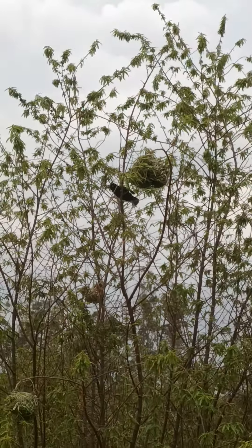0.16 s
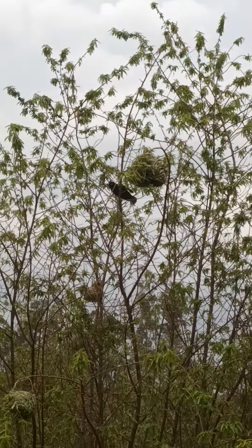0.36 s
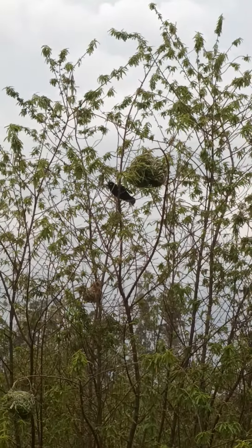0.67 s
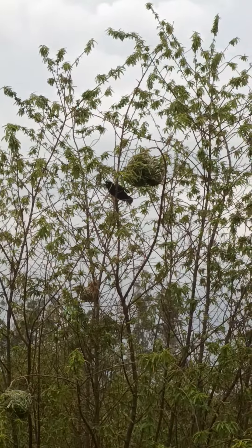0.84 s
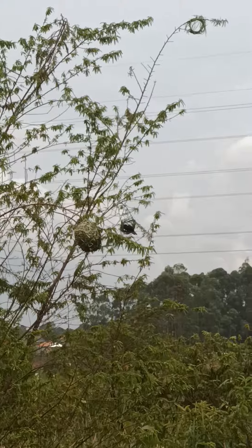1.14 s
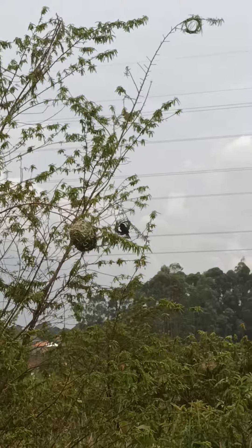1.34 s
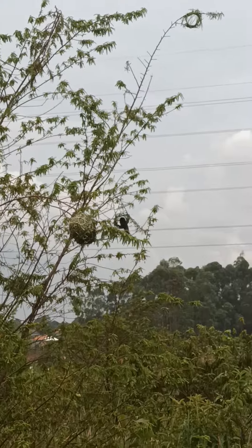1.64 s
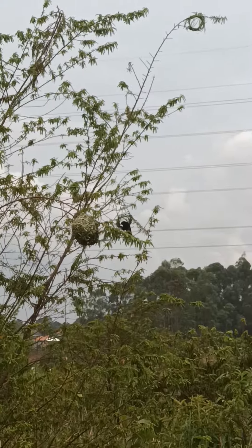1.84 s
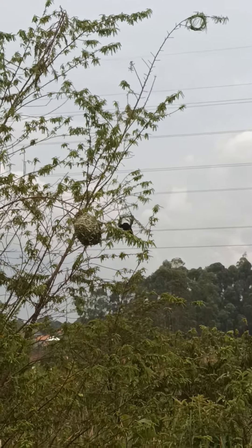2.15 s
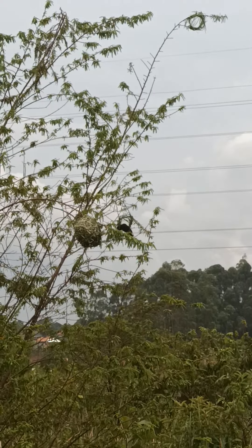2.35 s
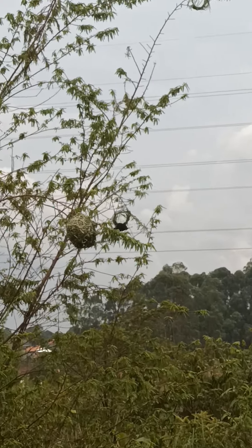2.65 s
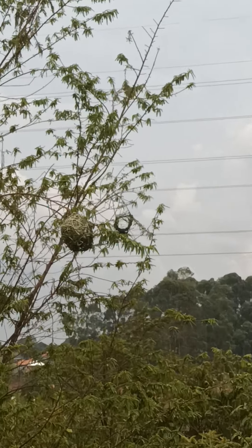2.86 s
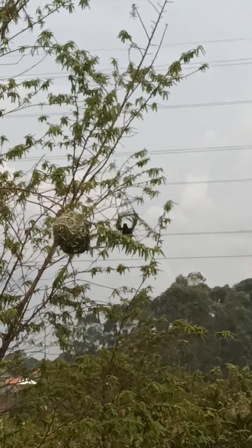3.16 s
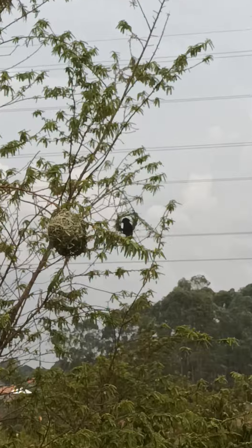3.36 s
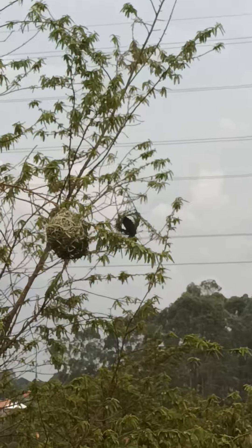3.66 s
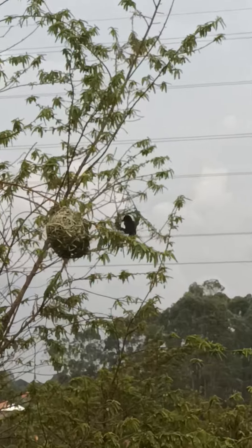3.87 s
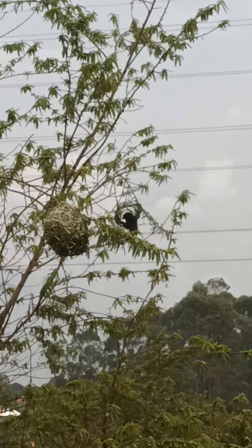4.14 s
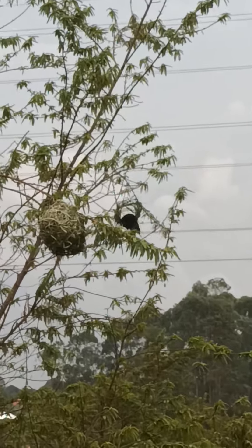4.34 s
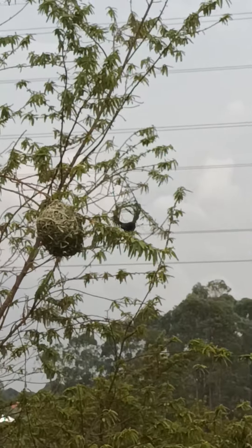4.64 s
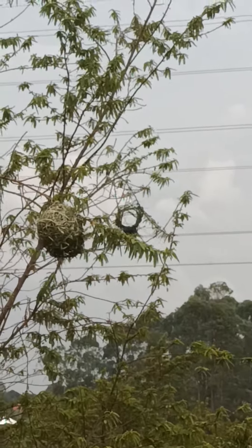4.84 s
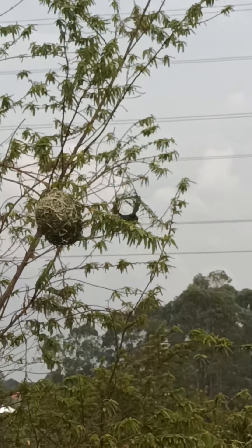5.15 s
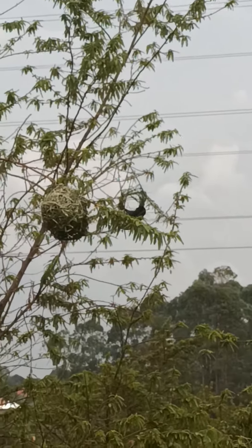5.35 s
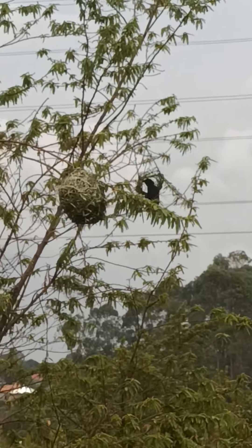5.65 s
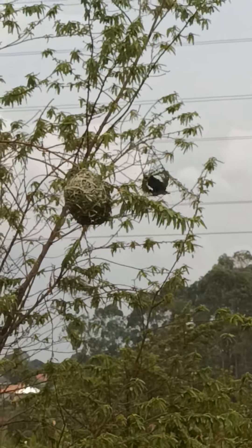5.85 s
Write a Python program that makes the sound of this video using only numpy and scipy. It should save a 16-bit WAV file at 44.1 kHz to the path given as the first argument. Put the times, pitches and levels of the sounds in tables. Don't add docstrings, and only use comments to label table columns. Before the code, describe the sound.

A weaver colony in a thin, leafy tree, heard outdoors in phone stereo, the near birds slightly left. A haze of far twittering, soft steady cricket trills and a low wavering road hum run throughout. From 0.3 s, bright rising two-toned calls ending in tiny rasps repeat among high pips and quick slurs; a dull, faint case tap comes at 0.4 s. The chatter swells by 0.7 s. Around 1.5 s there is a dry rattle with a nasal whine, then another call. From 2 to 3 s it is thickest: sharp short calls, rasps, a steep chirp, a slow churr and a faint low whistle falling near 3 s. A long buzzing wheeze stretches from 3.7 to 4.3 s, with a quick low whistle and a call within it. Calls cluster again at 4.4-4.7 s, thin out, then return with rasps and a faint whine from 5.1 s to the end.

```python
import sys
import numpy as np
from scipy import signal
from scipy.fft import rfft, irfft, next_fast_len
from scipy.io import wavfile
from scipy.ndimage import uniform_filter1d, map_coordinates

SR = 44100
rng = np.random.default_rng(int(sys.argv[2]) if len(sys.argv) > 2 else 0)


def to_linear_factor(level_db):
    exponent = np.asarray(level_db, float) / 20
    return 10 ** exponent


def file_out(sig):
    cols = np.atleast_2d(sig).T
    lim = np.clip(cols, -1, 1)
    pcm = np.round(lim * 32767).astype(np.int16)
    wavfile.write(sys.argv[1], SR, pcm)


N = 264600

# time in seconds, level in dB.
EXCITEMENT = [(0, -46.5), (.23, -46), (.7, -40.5), (1.3, -42.5), (1.47, -45.5), (1.6, -41.5), (2.0, -42.5),
              (2.32, -40.5), (3.02, -43), (3.5, -44), (4.0, -45.5), (4.3, -45), (4.5, -42), (4.7, -43.5),
              (4.9, -45.5), (5.2, -43.5), (5.46, -47), (6.0, -44)]
# frequency in Hz, density in dB per Hz.
HAZE_LOW = [(1500, -10), (2200, -1.5), (2800, -5.5), (3600, 2.5)]
HAZE_BODY = [(2240, -59), (3800, -14), (4260, -5), (4940, -9.5), (5610, -1.5), (7330, -12.5), (8000, -14.5),
             (10400, -17), (17600, -120)]
HAZE_TOP = [(4120, -38), (7000, -6.5), (9710, -9.5), (12000, -17), (12900, -18.5), (14800, -16),
            (15500, -23), (15800, -51)]
ROAD = [(15, -26), (25, -7.5), (48, 1.5), (74, -0.5), (103, -4), (173, -18), (301, -13.5), (505, -18),
        (880, -19), (1430, -20.5), (1800, -21.5), (2340, -36), (3960, -120)]
# frequency in Hz, correlation [0 to 1].
PORT_LIKENESS = [(60, 1), (300, 0.86), (700, 0.76), (1200, 0.52), (2500, 0.17), (8000, 0.06)]
# frequency in Hz, gain in dB.
MICROPHONE = [(25, -0.5), (45, 1), (9500, -1), (11500, -6), (15000, -1.5), (15760, -1), (15790, -80)]
# frequency in Hz, share of moments [0 to 1].
EMPTIED = [(1200, 0), (1500, .05), (2000, .08), (2700, .2), (3400, .07), (4000, .03), (9000, .04),
           (10000, .3), (11500, .6), (13000, .46), (14800, .46), (15500, .8)]
# start in seconds, peak in dB.
TAPS = [
    (0.425, -44),
]
# start in seconds, length in seconds, pitch in Hz, pulses per second, level in dB.
CRICKETS = [
    (3.0, 1.58, 8350, 68.2, -47),
    (0, .7, 4400, 39.6, -48.5),
    (.7, 3.7, 4450, 39.6, -54),
    (4.4, 1.7, 4500, 39.6, -49.5),
    (0, 6, 5750, 90, -52),
]
# time in seconds, pitch in Hz, level in dB.
LOW_WHISTLES = [
    [(0, 1565, -72), (.2, 1499, -55), (.33, 1445, -56.5), (.42, 1340, -53)],
    [(2.78, 1260, -55), (2.84, 1488, -56.5), (3.03, 1410, -51), (3.17, 1228, -52.5), (3.32, 1166, -58),
     (3.55, 937, -66)],
    [(3.83, 1900, -52), (3.86, 2350, -54), (3.92, 2600, -49), (3.99, 2700, -47), (4.1, 2410, -49)],
    [(5.2, 2310, -57), (5.3, 2120, -58), (5.52, 2000, -61), (5.565, 1760, -53), (5.6, 1680, -52),
     (5.635, 1400, -57)],
    [(1.99, 3700, -40), (2.04, 4050, -37), (2.075, 3500, -39)],
    [(0, 2070, -62), (.12, 2015, -57)],
    [(4.27, 1154, -59), (4.34, 1400, -57), (4.41, 1694, -50)],
]
# start in seconds, length in seconds, pitch in Hz, pulses per second, level in dB.
CHURRS = [
    (2.363, .428, 2920, 41, -53),
    (2.419, 0.18, 930, 91, -57),
    (4.162, 0.153, 1040, 68.5, -55),
]
# start in seconds, length in seconds, centre in Hz, width in Hz, level in dB.
RASPS = [(0.073, 0.071, 6820, 3970, -41), (0.602, 0.053, 6460, 3000, -48),
         (1.868, 0.056, 5050, 6500, -35.5), (2.099, 0.075, 7100, 2520, -35),
         (5.141, 0.066, 3260, 2200, -45), (2.334, 0.071, 10300, 1800, -38), (2.552, 0.085, 6500, 4500, -38),
         (2.788, 0.068, 4660, 2500, -37), (3.304, 0.62, 10480, 1500, -49.5),
         (4.557, 0.017, 6250, 6000, -37.5), (5.219, 0.036, 4800, 1500, -37.5),
         (5.221, 0.032, 8100, 2500, -42.5), (5.602, 0.048, 5530, 4150, -36), (1.874, 0.38, 2180, 600, -55),
         (2.85, 0.26, 2800, 910, -49.5)]
# start in seconds, length in seconds, pitch in Hz,
# pulses per second, level in dB.
WHEEZES = [(3.68, .64, 5450, 378, -35), (3.5, .75, 9500, 378, -50), (3.55, .7, 11500, 378, -56),
           (3.72, .42, 10100, 378, -49), (3.76, .5, 10900, 378, -50), (3.6, .8, 14300, 378, -59),
           (3.65, .7, 15300, 378, -62), (1.52, .2, 4400, 123, -48), (1.54, .27, 3750, 123, -44),
           (1.62, .19, 3350, 123, -43), (5.14, .32, 3050, 150, -53), (5.16, .42, 2120, 150, -52.5),
           (5.16, .46, 2600, 150, -53), (5.14, .3, 1550, 150, -62), (5.14, .4, 1030, 150, -60),
           (5.62, .14, 1300, 90, -57)]
# start in seconds, length in seconds, centre in Hz, width in Hz, pulses per second, level in dB.
RATTLES = [
    (1.55, .25, 4000, 260, 61.5, -40.5),
]
# start in seconds, length in seconds, # pitch in Hz, level in
# dB.
PIPS = [(0.058, 0.033, 8400, -36), (0.073, 0.013, 6670, -27.5), (0.105, 0.015, 6640, -29),
        (0.056, 0.028, 5260, -37.5), (0.629, .03, 7560, -38), (0.855, .027, 7120, -34.5),
        (0.883, 0.024, 6470, -32.5), (0.912, 0.019, 3950, -38), (1.161, 0.033, 5830, -27.5),
        (1.35, 0.033, 6780, -38), (1.399, .022, 5750, -35), (1.31, 0.065, 3954, -36.5),
        (1.566, 0.026, 4150, -35), (1.867, 0.04, 4010, -35), (1.908, 0.029, 6550, -42),
        (1.946, 0.026, 3560, -41), (2.151, 0.023, 6900, -34), (2.359, 0.048, 6940, -31),
        (2.378, 0.036, 3850, -44), (2.449, 0.049, 5120, -35.5), (2.484, 0.014, 6520, -33),
        (2.716, 0.032, 5020, -34.5), (3.02, 0.074, 5660, -39), (3.084, 0.026, 4095, -40.5),
        (3.195, 0.01, 9340, -36.5), (3.35, 0.036, 5630, -33.5), (3.358, .036, 4130, -42),
        (4.44, 0.03, 5660, -41), (4.49, 0.023, 3326, -40.5), (2.129, 0.023, 7550, -32),
        (2.82, 0.02, 4250, -35.5), (2.86, 0.02, 3900, -34.5), (3.042, 0.054, 6870, -40),
        (3.731, 0.047, 6900, -39.5), (4.508, .016, 5460, -40), (4.542, 0.058, 3640, -47),
        (2.345, 0.038, 10300, -38), (4.545, .02, 1843, -48), (4.925, 0.024, 2150, -51),
        (1.16, 0.029, 4200, -43), (5.954, 0.042, 7540, -33), (5.61, .04, 4740, -37), (5.62, .02, 9400, -40),
        (1.24, 0.052, 2210, -48), (1.57, 0.089, 2450, -48.5), (5.28, .05, 483, -60),
        (2.15, 0.053, 9500, -40), (5.62, 0.071, 1000, -58)]
MORE_PIPS = [(2.183, 0.027, 5600, -31.5), (2.21, .04, 4000, -42), (2.29, 0.042, 3500, -41.5),
             (2.405, 0.021, 5400, -31), (2.635, 0.022, 4050, -34), (2.96, .04, 3450, -46),
             (1.18, 0.022, 3450, -47), (1.37, .015, 3650, -39), (.145, .02, 4150, -41)]
# start in seconds, length in
# seconds, first pitch in Hz, last pitch in Hz, level in dB.
RISES = [(0, 0.073, 7800, 8350, -43), (.245, 0.032, 6500, 7400, -41.5), (.59, .061, 6050, 6620, -37),
         (.69, .02, 6060, 7030, -42), (1.135, 0.012, 6850, 7600, -28.5), (1.7, 0.056, 1450, 1580, -51),
         (1.885, 0.043, 4830, 5140, -37), (2.02, .06, 5150, 5490, -39.5), (2.075, .04, 5550, 6050, -33.5),
         (2.11, .028, 6260, 7550, -29), (2.33, .04, 5400, 5740, -40), (2.52, 0.067, 5280, 5900, -42.5),
         (3.67, 0.072, 1060, 1400, -59.5), (4.055, .065, 2890, 3010, -47.5), (4.71, .07, 2300, 2960, -51),
         (4.775, 0.039, 5890, 6500, -36), (4.81, .05, 6750, 7810, -35.5), (2.755, .03, 8300, 9000, -38),
         (2.83, 0.028, 8400, 9020, -39), (3.33, .05, 5300, 5750, -40.5), (.6, .05, 6600, 7600, -41),
         (1.36, .04, 5290, 5820, -37), (5.085, 0.072, 1924, 2030, -54.5)]
CLIMBS = [
    (2.748, .045, 5500, 7700, -31.5),
    (1.423, .052, 6400, 8250, -33.5),
    (.325, 0.026, 4600, 5500, -38),
]
FALLS = [(.27, 0.057, 6770, 6280, -38.5), (0.082, 0.027, 8400, 7300, -44), (1.383, .016, 5800, 5600, -35),
         (3.77, 0.033, 8000, 4800, -38), (3.77, 0.029, 5900, 5200, -41), (3.085, 0.0253, 7300, 6000, -36),
         (3.085, 0.0245, 5900, 5300, -36), (2.4, 0.0223, 6300, 6500, -34), (2.13, .03, 3400, 3050, -46),
         (4.466, .015, 7900, 7000, -36), (4.676, .014, 7200, 5300, -34), (4.905, .03, 4300, 2200, -46),
         (1.6, .022, 6800, 5800, -35), (5.843, .012, 7000, 3400, -30), (1.665, 0.0138, 5800, 4200, -31),
         (1.5, 0.013, 7500, 5500, -39), (5.015, 0.048, 3050, 2400, -52), (4.435, .035, 2650, 1900, -53),
         (5.79, 0.0405, 3100, 2400, -50.5), (.78, .04, 3200, 2600, -49), (.4, 0.019, 6900, 6000, -35),
         (3.42, 0.027, 7100, 7800, -41), (0.97, 0.013, 5800, 5520, -30), (1.225, 0.043, 4020, 2900, -41.5),
         (1.41, 0.02, 4370, 3650, -32.5), (1.53, 0.024, 9450, 8300, -34.5), (1.95, 0.023, 7150, 6700, -40),
         (2.41, 0.025, 11000, 9300, -30.5), (2.6, .03, 7000, 5640, -35), (2.635, 0.062, 4100, 3680, -36),
         (2.69, 0.0197, 4500, 4060, -32.5), (2.68, .023, 8930, 8400, -44), (3.195, 0.017, 4910, 4090, -36),
         (3.235, .03, 1800, 1570, -47), (3.44, .07, 6100, 5360, -34.5), (3.62, 0.047, 4600, 2160, -50),
         (3.91, 0.035, 4460, 2460, -50), (4.22, 0.029, 2610, 1200, -51.5), (4.585, 0.015, 1800, 1820, -43),
         (2.243, .052, 6100, 3900, -40), (4, 0.028, 4400, 3140, -55), (4.985, 0.024, 4500, 3950, -38),
         (5.16, 0.035, 4630, 3900, -45), (5.21, 0.019, 4680, 4300, -37)]
# start in seconds, length in seconds, upper voice in Hz, lower voice in Hz, level in dB.
ARCHED_CALLS = [(0.991, 0.084, 6590, 2470, -26.5), (1.261, 0.1, 6585, 2533, -28),
                (1.58, 0.094, 6520, 2350, -28.5), (2.176, 0.098, 6880, 2780, -32.5),
                (2.82, .1, 6810, 3020, -30.5), (5.308, 0.11, 6450, 2930, -34.5)]
CLIMBING_CALLS = [(0.329, 0.086, 6520, 2877, -28), (.455, 0.13, 6800, 2110, -31),
                  (0.74, 0.087, 6500, 2960, -29.5), (4.028, 0.08, 6260, 2990, -28.5),
                  (4.403, 0.07, 7100, 2170, -33.5), (4.589, 0.097, 6390, 2880, -29),
                  (4.962, 0.1, 6380, 2690, -33.5), (5.563, 0.081, 7300, 2040, -39.5),
                  (5.747, 0.099, 6370, 3010, -30.5), (5.922, 0.06, 7200, 2060, -39.5)]
SHORT_CALLS = [
    (2.312, 0.045, 7050, 2800, -27.5),
    (2.986, 0.052, 7200, 2714, -35),
    (3.67, .06, 6970, 2770, -34.5),
    (4.71, 0.051, 7120, 2760, -34),
]


def unit(x):
    return x / np.sqrt(np.mean(x ** 2) + 1e-20)


def along(points, hz):
    f, v = np.transpose(points)
    return np.interp(np.log(hz + 1), np.log(f + 1), v)


def wobble(rate, size=N):
    knots = rng.standard_normal(int(size * rate / SR) + 4)
    return map_coordinates(knots, [np.arange(size) * rate / SR])


def filtered(x, response):
    m = next_fast_len(x.shape[-1] + 2048)
    spectrum = rfft(x, m) * response(np.fft.rfftfreq(m, 1 / SR))
    return irfft(spectrum, m)[..., :x.shape[-1]]


def add(out, s, sound, side_db):
    for channel, db, late in ((0, 0.013, 0), (1, -side_db, rng.integers(16))):
        spot = out[channel, round(s * SR) + late:][:len(sound)]
        spot += to_linear_factor(db) * sound[:len(spot)]


def swell(size, edge_s):
    t = np.arange(size) / SR
    to_edge = np.minimum(t, t[::-1])
    return np.sin(np.pi / 2 * np.clip(to_edge / edge_s, 0, 1)) ** 2


def rush(spectrum, patchy_db):
    z = signal.stft(rng.standard_normal((2, N)), nperseg=512)[2]
    field = uniform_filter1d(rng.standard_normal(z.shape[1:]), 5, axis=0)
    field = uniform_filter1d(field, 8, axis=1)
    pair = signal.istft(z * to_linear_factor(patchy_db * unit(field)), nperseg=512)[1][:, :N]
    closed = [(spectrum[0][0] * .7, -70), *spectrum, (spectrum[-1][0] * 1.3, -70)]

    def shared_and_differing(hz):
        turn = np.arccos(np.clip(along(PORT_LIKENESS, hz), -1, 1)) / 2
        return to_linear_factor(along(closed, hz)) * [np.cos(turn), np.sin(turn)]

    shared, differing = filtered(pair, shared_and_differing)
    return unit(np.array([shared + differing, shared - differing]))


def road():
    return to_linear_factor(-51.5 + 0.88 * wobble(2.84)) * rush(ROAD, patchy_db=2.0)


def colony_blur():
    t = np.arange(N) / SR
    body_db = np.interp(t, *np.transpose(EXCITEMENT))
    swing_db = body_db - body_db.mean()
    settling_db = 1.1 * (t - N / 2 / SR)
    body = to_linear_factor(body_db + 1.0) * rush(HAZE_BODY, patchy_db=5.0)
    top = to_linear_factor(-49 + 1.33 * swing_db - settling_db) * rush(HAZE_TOP, patchy_db=5.5)
    low = to_linear_factor(-53.5 + 1.72 * swing_db) * rush(HAZE_LOW, patchy_db=6.5)
    return body + top + low * to_linear_factor([[2.4], [-2.6]])


def background():
    return (colony_blur() + road()) * to_linear_factor([[1.8], [-1.8]])


def tap():
    out, t = np.zeros((2, N)), np.arange(400) / SR
    for s, db in TAPS:
        dull = uniform_filter1d(rng.standard_normal(len(t)), size=9) * 3
        add(out, s, to_linear_factor(db - 60 * t / 0.046) * dull, side_db=-4)
    return out


def voice(length, hz, shake):
    size = int(length * SR)
    glide = np.interp(np.linspace(0, 1, size), [0, .55, 1], hz)
    glide = uniform_filter1d(glide, size // 6 + 1, mode="nearest")
    glide = glide * (1 + shake * wobble(245.3, size))
    return 2 * np.pi * (np.cumsum(glide) / SR + rng.random())


def flutter(size, depth_db):
    unsteady_db = depth_db * (wobble(70, size) + .5 * wobble(400, size))
    return 2 ** .5 * unit(to_linear_factor(unsteady_db)) * swell(size, edge_s=.014)


def whistles(rows, sides):
    out = np.zeros((2, N))
    for (s, length, *hz, db), side_db in zip(rows, sides):
        phase = voice(length + .01, hz, shake=.01)
        tone = np.sin(phase) + to_linear_factor(-22.0) * np.sin(2 * phase)
        breath = flutter(len(phase), depth_db=3.5 * min(1, hz[1] / 5000))
        add(out, max(s - .005, 0), to_linear_factor(db) * breath * tone, side_db)
    return out


def pulsed(rows, scatter, sharp, edge, side_db, tonal, uneven_db, sweep=2.5):
    out = np.zeros((2, N))
    for s, length, hz, width_hz, rate, db in rows:
        size = int(length * SR)
        turns = np.cumsum(rate * (1 + scatter * wobble(rate / 2, size))) / SR
        gate = np.abs(np.sin(np.pi * turns)) ** sharp * to_linear_factor(uneven_db * wobble(25.06, size))

        def resonance(f):
            low_cut = f ** 6 / (f ** 6 + (.5 * hz) ** 6)
            return np.exp(-((f - hz) / width_hz) ** 2) * low_cut

        falling_hz = hz * (1 + .006 * wobble(40, size)) + sweep * width_hz * (.5 - turns % 1)
        chirp = np.sin(2 * np.pi * np.cumsum(falling_hz) / SR)
        carrier = unit(filtered(rng.standard_normal(size), resonance)) + tonal * chirp
        add(out, s, to_linear_factor(db) * unit(gate * carrier) * swell(size, edge * min(length, .15)), side_db)
    return out


def far_birds(count=600):
    u = rng.random((count, 6))
    start = N / SR * u[:, 0]
    length = .02 + .03 * u[:, 1]
    knee = 3900 + 5000 * u[:, 5] ** 1.3
    slope = .5 * (u[:, 2] - .55)
    db = np.interp(start, *np.transpose(EXCITEMENT)) - 9.5 + 6 * np.log10(u[:, 4])
    rows = np.c_[start, length, knee * (1 - slope), knee, knee * (1 + slope * u[:, 3]), db]
    return whistles(rows, -2 + 12 * u[:, 3])


def crickets():
    rows = [(s, length, hz, 240, rate, db) for s, length, hz, rate, db in CRICKETS]
    return pulsed(rows, scatter=.004, sharp=2, edge=.3, side_db=3.5, tonal=4, uneven_db=1.3, sweep=3)


def low_whistles():
    out = np.zeros((2, N))
    for rows in LOW_WHISTLES:
        s, hz, db = np.transpose(rows)
        t = np.arange(s[0], s[-1], 1 / SR)
        glide = uniform_filter1d(np.interp(t, s, hz), size=900, mode="nearest")
        glide = glide * (1 + .005 * wobble(200, len(t)))
        tone = np.sin(2 * np.pi * np.cumsum(glide) / SR)
        loudness = to_linear_factor(np.interp(t, s, db)) * flutter(len(t), depth_db=1.5)
        add(out, max(s[0], 0), loudness * tone, side_db=11)
    return out


def wheezes():
    rows = [(s, length, hz, .055 * hz, rate, db) for s, length, hz, rate, db in WHEEZES]
    return pulsed(rows, scatter=.04, sharp=1.5, edge=.8, side_db=2, tonal=.6, uneven_db=1)


def rattle():
    return pulsed(RATTLES, scatter=.01, sharp=7, edge=.2, side_db=5, tonal=1, uneven_db=1.5)


def call_ends(rows, lead, length, hz, width_hz, end_db, grows):
    return [(s + call_length - lead, length, hz, width_hz, end_db + grows * (db + 28.5))
            for s, call_length, _, _, db in rows]


def rasps():
    ends = call_ends(ARCHED_CALLS, lead=.027, length=.052, hz=6200, width_hz=6000, end_db=-38.5, grows=2.7)
    ends += call_ends(CLIMBING_CALLS, lead=.024, length=.027, hz=6200, width_hz=6100, end_db=-40.5, grows=.28)
    ends += call_ends(SHORT_CALLS, lead=.0065, length=.088, hz=7150, width_hz=4000, end_db=-36.5, grows=.23)
    rows = [(*row[:4], 345, row[4]) for row in RASPS + ends]
    rows += [(s, length, hz, .34 * hz, rate, db) for s, length, hz, rate, db in CHURRS]
    return pulsed(rows, scatter=0.111, sharp=2.0, edge=0.11, side_db=3.0, tonal=0, uneven_db=3.5)


def slurs(rows, knee):
    return [(s, length, a, a + knee * (b - a), b, db) for s, length, a, b, db in rows]


def short_whistles():
    rows = [(s, length, .985 * hz, 1.012 * hz, .98 * hz, db) for s, length, hz, db in PIPS + MORE_PIPS]
    rows += slurs(RISES, knee=.72) + slurs(FALLS + CLIMBS, knee=.55)
    rows += [(s + .56 * length, .048, .9 * hz, .85 * hz, .75 * hz, db - 7)
             for s, length, hz, low_hz, db in ARCHED_CALLS + CLIMBING_CALLS if low_hz > 2600]
    return whistles(rows, 3 + 8 * rng.random(len(rows)))


def calls(rows, start, end, sum_db, side_db):
    out = np.zeros((2, N))
    for s, length, hz, low_hz, db in rows:
        up = voice(length, hz * np.array([start, 1, end]), shake=.013)
        low = voice(length, low_hz * np.array([.85, 1, 1.02]), shake=.03)
        coupling_db = np.linspace(-8, 2, len(up))
        build_db = np.interp(np.linspace(0, 1, len(up)), [0, .25, .6, 1], [-4, 1, 1, -2])
        partials = [(up, 0), (low, -29), (up + low, sum_db + coupling_db),
                    (up - low, -22), (2 * up, -21), (up + 2 * low, -23)]
        call = np.zeros(len(up))
        for phase, gain_db in partials:
            call += to_linear_factor(db + gain_db + build_db) * flutter(len(up), depth_db=3) * np.sin(phase)
        add(out, s, call, side_db)
    return out


def weaver_calls():
    arched = calls(ARCHED_CALLS, start=.805, end=1.02, sum_db=-7.5, side_db=7)
    climbing = calls(CLIMBING_CALLS, start=.79, end=1.09, sum_db=-7.5, side_db=4)
    short = calls(SHORT_CALLS, start=.945, end=1.035, sum_db=-4, side_db=2)
    return arched + climbing + short


def leaves(x, t60):
    t = np.arange(SR // 3) / SR
    tail = rng.standard_normal((2, len(t))) * to_linear_factor(-60 * t / t60)
    return signal.fftconvolve(x, tail / np.linalg.norm(tail[0]), axes=1)[:, :N]


def scene():
    near = weaver_calls() + short_whistles() + low_whistles() + rasps() + wheezes() + rattle()
    grass = crickets()
    far = far_birds()
    scatter = to_linear_factor(-5.0) * leaves(near + 0.52 * grass + 0.7 * far, t60=0.17)
    return background() + tap() + grass + far + near + scatter


def thinned(x, size=2048, count=5):
    hz, _, z = signal.stft(x, SR, nperseg=size, noverlap=size * 3 // 4)
    power = (np.abs(z) ** 2).mean(0)[:len(hz) // count * count] + 1e-20
    band_db = 10 * np.log10(power.reshape(-1, count, z.shape[2]).mean(1))
    moment_db = 10 * np.log10(power.sum(0))
    whim = unit(uniform_filter1d(rng.standard_normal(band_db.shape), size=4, axis=1))
    need = uniform_filter1d(band_db - .8 * moment_db, size=3, axis=1) + 4.5 * whim
    rank = need.argsort(1).argsort(1) / need.shape[1]
    share = along(EMPTIED, hz[count // 2::count])[:len(rank), None]
    keep = np.repeat(rank >= share, count, axis=0)
    z[:, :len(keep)] *= keep
    return signal.istft(z, SR, nperseg=size, noverlap=size * 3 // 4)[1][:, :N]


def roll_off(x):
    return signal.sosfilt(signal.butter(12, 15800, fs=SR, output="sos"), x)


def record(dry):
    left, right = filtered(dry, lambda hz: to_linear_factor(along(MICROPHONE, hz)))
    late_left = np.roll(left, 45)
    mix = thinned(np.array([late_left, right]))
    return roll_off(mix)


dry = scene()
out = record(dry)
file_out(out)
```